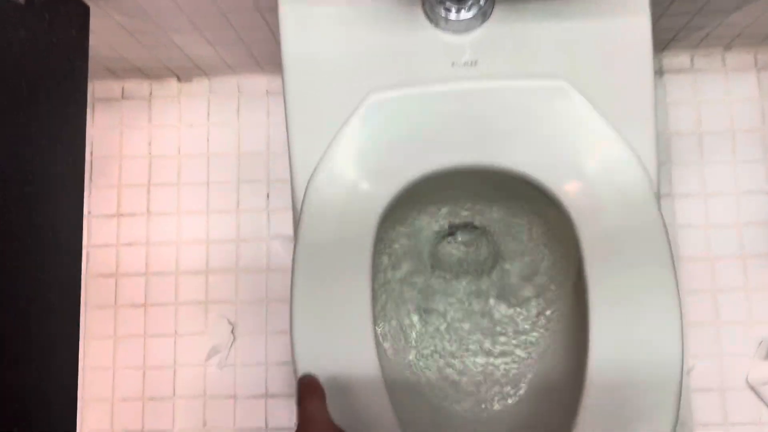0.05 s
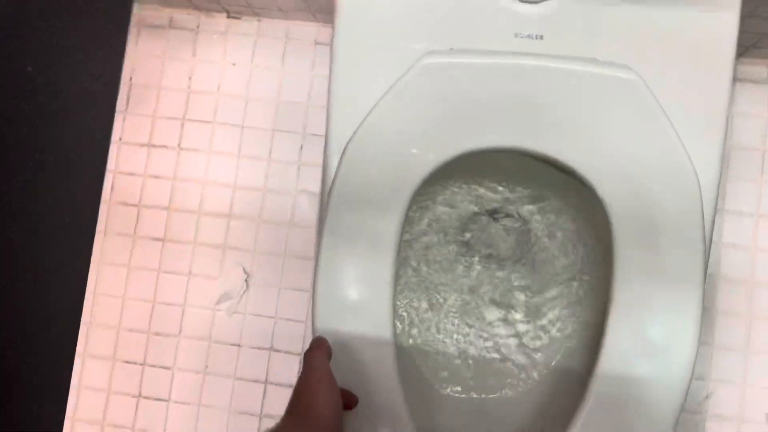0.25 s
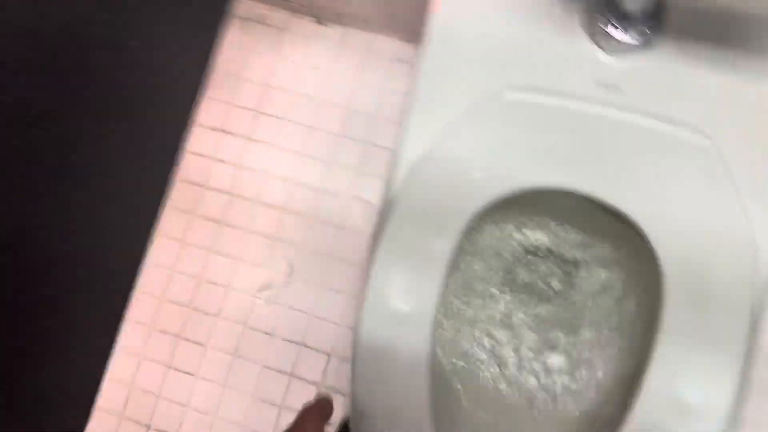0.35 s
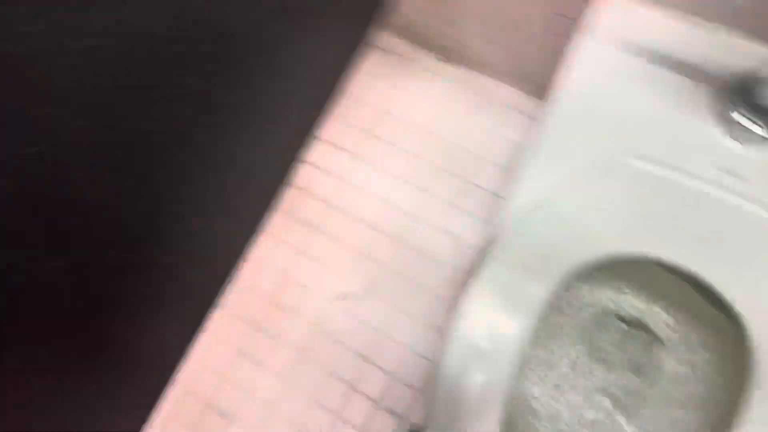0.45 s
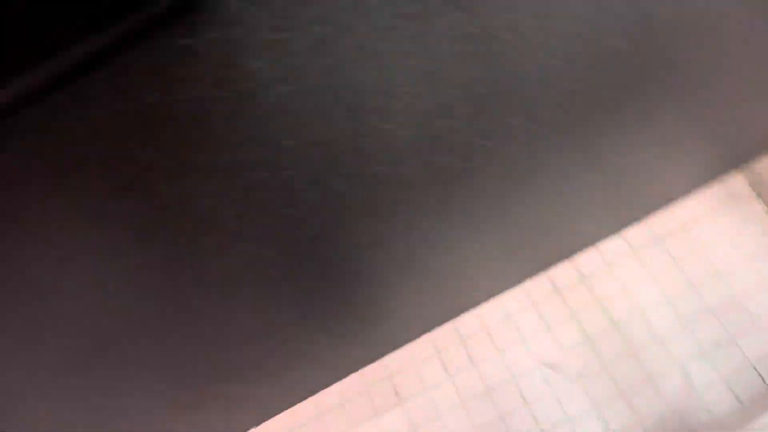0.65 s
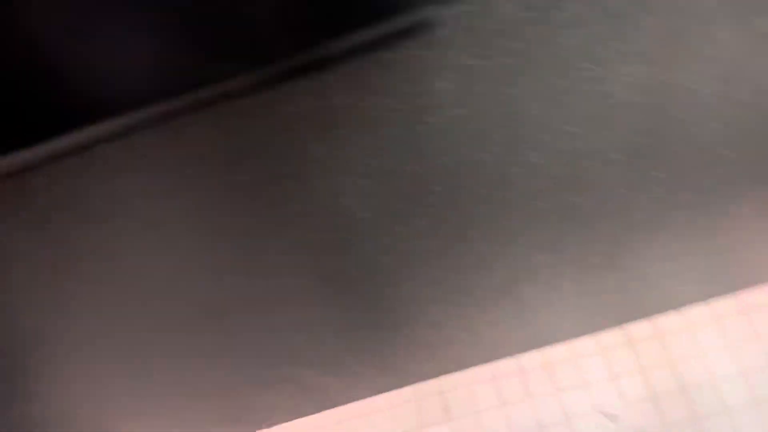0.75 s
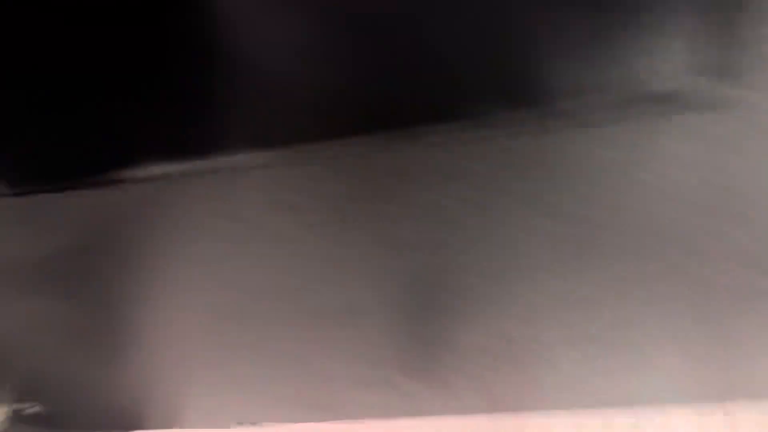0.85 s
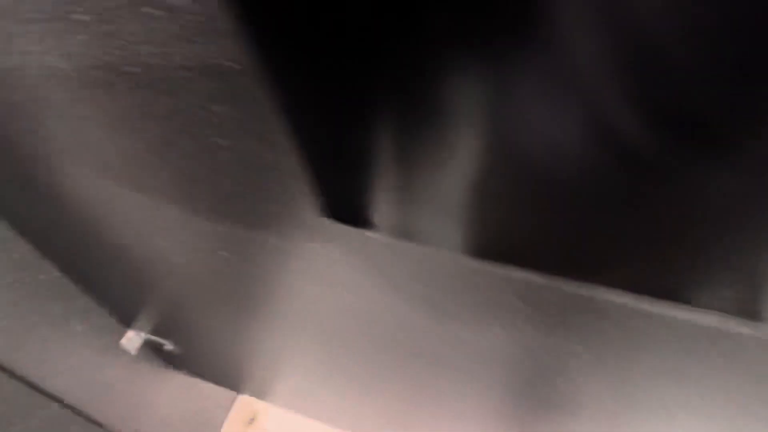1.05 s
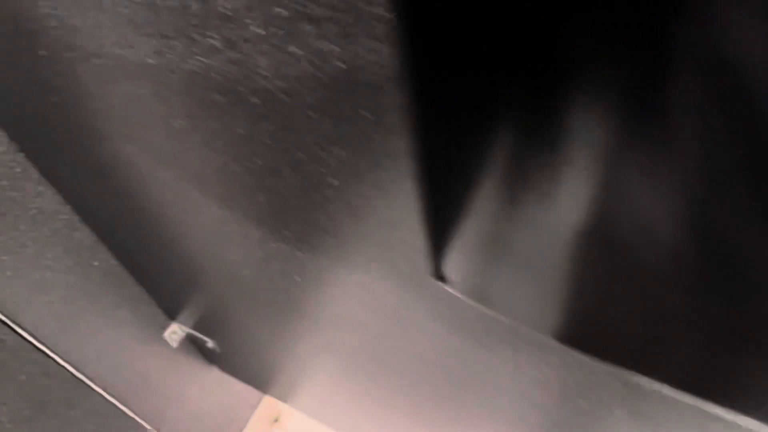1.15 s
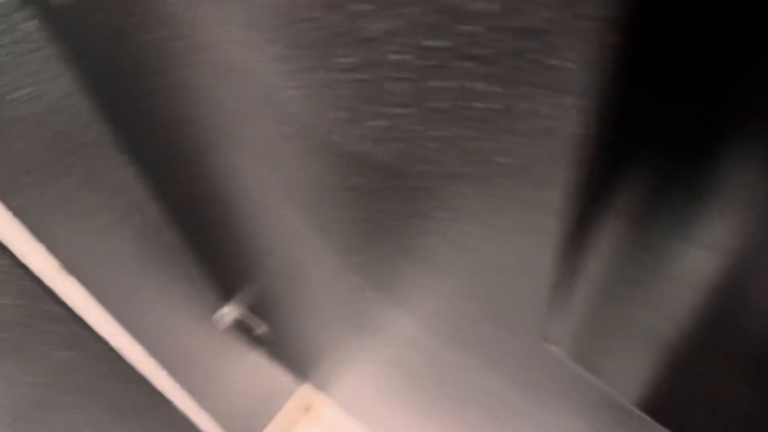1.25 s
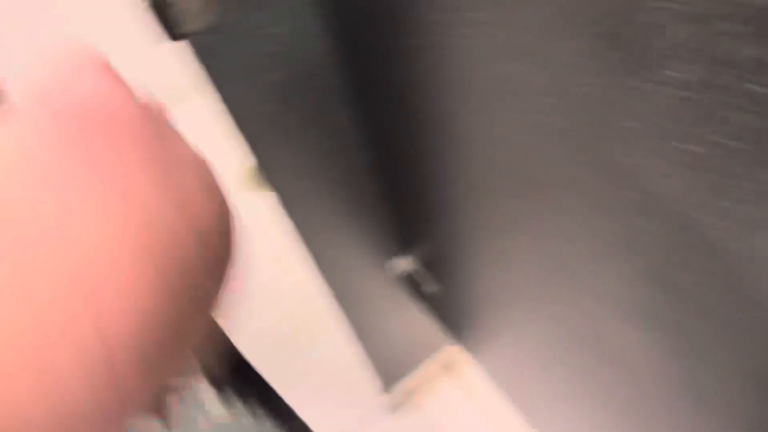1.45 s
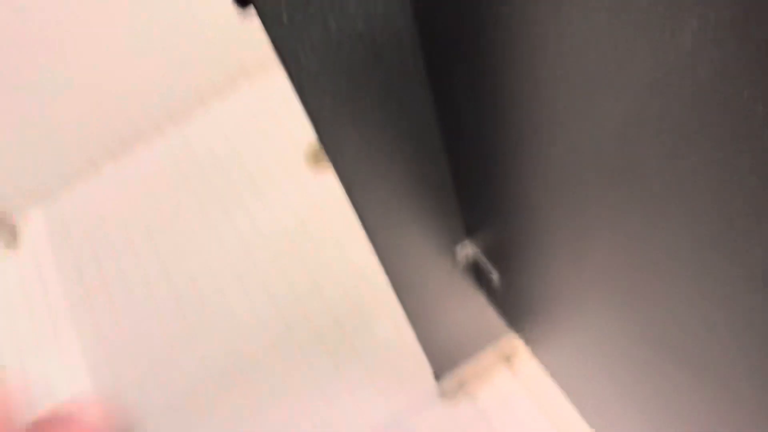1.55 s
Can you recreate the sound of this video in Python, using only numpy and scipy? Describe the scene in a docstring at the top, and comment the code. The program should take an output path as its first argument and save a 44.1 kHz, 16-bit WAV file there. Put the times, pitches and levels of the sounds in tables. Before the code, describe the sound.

A toilet seat drops onto the bowl with a sharp double clack in an echoing restroom.

```python
"""A toilet seat drops

A plastic seat falls on its porcelain bowl, chatters and bounces once; each hit cracks and rings.
The stall walls echo closely, and the tiled room rings on over humming, rumbling ventilation.
Then clothing rustles as someone turns round, with a few light knocks at the stall door."""
import sys
import numpy as np
from scipy import signal
from scipy.fft import rfft, irfft, next_fast_len
from scipy.io import wavfile
from scipy.ndimage import map_coordinates

SR = 44100
rng = np.random.default_rng(int(sys.argv[2]) if len(sys.argv) > 2 else 0)


def wav_record(signal):
    """Record a signal, one row per channel, as 16-bit PCM in the file named by sys.argv[1]."""
    frames = np.transpose(np.atleast_2d(signal))
    bounded = np.clip(frames, -1, 1)
    # unit amplitude maps onto the largest positive 16-bit level
    quanta = np.round(bounded * 32767).astype(np.int16)
    wavfile.write(sys.argv[1], SR, quanta)


N = 70560

# Levels are relative. A decay is the time to fade by 60 dB; a tilt above 0 adds treble.
# how alike left and right sound: f/Hz, likeness (1 = the same)
LIKENESS = [(60, 0.98), (350, 0.64), (520, 0.59), (900, 0.16), (2000, 0.1), (12000, 0.099)]
# duct rumble and fan tones: f/Hz, level/dB
DUCT_COLOUR = [(15, -19.5), (32, -24), (48, -1.5), (68, 2), (95, -7), (135, 1), (165, -14), (210, -12),
               (300, -19.5), (500, -25), (1000, -35), (2000, -41), (4000, -56), (8000, -63.5), (15000, -53)]
FAN_TONES = [(119.5, -37.5), (187, -47), (488, -56.5)]
# the seat hits the bowl: t/s, level/dB, crack and tick/dB, left over right/dB, tilt/(dB per octave)
SEAT_HITS = [(0.2001, -8.5, 0.5, 1, 0.77), (.2179, -15.5, 1, -1.5, 0.5), (0.2291, -17, 2.5, -1.5, -1),
             (0.2964, -11, -2, -0.5, -0.34), (0.3105, -19.5, 1.5, -1.5, -1.5)]
# ringing tones of seat and bowl: f/Hz, level/dB, decay/s, left over right/dB
SEAT_TONES = [(244.5, -10, 0.059, 2.5), (307.7, -10.5, 0.042, -14.5), (553.4, -14, 0.1, 3),
              (686, -7.5, 0.073, 8), (761, -5, 0.054, -2), (850, -12.5, 0.036, -18.5),
              (940, -24, 0.055, -5), (1170, -14.5, 0.086, 10), (1472, -19, 0.089, 3), (1787, -8, 0.073, -3),
              (2119, -8, 0.073, -9.5), (2065, 2.5, 0.017, -3), (2160, -28, 0.065, -13),
              (2630, -6, 0.019, 8.5), (3302, -18, 0.07, -13.5), (4860, -22, 0.028, 5)]
# the crack and the bright tick of a hit: f/Hz, level/dB
CRACK_COLOUR = [(60, -8), (260, -7.5), (390, -12), (560, -1), (720, 5), (1200, -5), (1550, -3.5),
                (1800, -3), (2120, 1.5), (2450, -4.5), (3200, -10), (3900, -19), (5000, -20.5), (7000, -33),
                (8500, -40.5), (15000, -49)]
TICK_COLOUR = [(2000, -12), (5000, 5), (8000, 14), (11500, -11), (14500, -2)]
# how long the stall and the room echo: f/Hz, decay/s
STALL_DECAY = [(200, 0.16), (2000, 0.078), (10000, 0.13)]
ROOM_DECAY = [(100, 3.3), (400, 1.55), (1000, 1.68), (2000, 1.37), (4000, 1.44), (10000, 2.1)]
# how strongly they echo: f/Hz, level/dB
STALL_COLOUR = [(200, -5), (400, -13.5), (700, 0.5), (1100, -1), (2000, 2.5), (3200, 1.5), (8000, 3.5)]
ROOM_COLOUR = [(80, 7.5), (250, -15.5), (410, 12.5), (540, -7), (680, -11), (950, 4), (1300, 1.5),
               (2100, -6.5), (2600, -5.5), (3200, -3), (8000, -12)]
# tones of the floor and of the room's standing waves: f/Hz, level/dB, decay/s
FLOOR_TONES = [(72.1, -14.5, 0.4), (132, -28, 0.6)]
ROOM_TONES = [(404.2, -33, 1.55), (489, -37.5, 1.52), (697.7, -32, 1.3), (740, -35, 0.67), (867, -37, 1.58)]
# how the cloth's hiss and low swish swell: t/s, level/dB
HISS_LEVELS = [(0, -60), (.45, -58.5), (.64, -55.5), (.8, -64), (1.0, -63.5), (1.07, -50.5), (1.13, -53),
               (1.2, -52.5), (1.3, -62.5), (1.42, -61.5), (1.6, -52.5)]
SWISH_LEVELS = [(0, -86), (.2, -39.5), (.9, -47), (1.08, -41.5), (1.23, -36.5), (1.35, -36.5), (1.5, -40),
                (1.6, -33)]
# their mix of bass and treble: f/Hz, level/dB
HISS_COLOUR = [(300, 3), (1000, 1.5), (2500, -5), (4200, -4.5), (6500, -6), (8500, -4), (11000, -17.5),
               (14500, -12)]
SWISH_COLOUR = [(20, -49), (60, -4), (130, 6), (210, 4), (330, -9), (600, -22), (1100, -22), (2500, -36),
                (8000, -52.5)]
# knocks at the door: t/s, level/dB, tilt/(dB per octave), bump/dB, panel ring/dB
DOOR_KNOCKS = [(0.915, -35.5, -6, -9, -5), (1.4795, -33, 0, -28, -1.5), (1.49, -36.5, -1.5, 1, -6),
               (1.563, -40, 6.5, -16, -19), (1.5672, -27.5, -4.5, 3.5, -10.5)]
# ringing tones of the door panel: f/Hz, level/dB, decay/s
DOOR_TONES = [(324.3, -3.5, 0.275), (716.3, -5, 0.27), (982, -4, 0.087), (1075, -12, 0.1), (1469, -4, 0.07),
              (1726, -11, 0.13), (2820, -17.5, 0.1), (3460, -5.5, 0.014)]
# the tap of a knock: f/Hz, level/dB
TAP_COLOUR = [(100, -30), (400, -12), (900, 7), (1300, 3.5), (2100, 0), (2700, -2), (3800, -1.5),
              (5500, -15.5), (8500, -15), (11000, -33), (15000, -34)]

ATTACK_S, ROOM_GAP_S, BACKGROUND_PAN_DB = 0.0007, 0.014, -2


def amp(db):
    """Turn decibels into a gain to multiply by."""
    return 10 ** (np.asarray(db) / 20)


def pan(db):
    """Left and right gains; above 0 the left is louder."""
    return amp(np.array([[db], [-db]]) / 2)


def along(points, hz):
    """Read between a table's rows on a pitch (log) scale."""
    freqs, values = np.transpose(points)
    return np.interp(np.log(hz + 1), np.log(freqs + 1), values)


def since(s):
    """Seconds since a moment, zero before it."""
    return np.maximum(np.arange(N) / SR - s, 0)


def fade(t, decay_s, rise_s=ATTACK_S):
    """Rise quickly, then die away."""
    return np.exp(-np.log(1000) * t / decay_s) * (1 - np.exp(-t / rise_s))


def wobble(rate):
    """A smooth curve through `rate` random points a second."""
    return map_coordinates(rng.standard_normal(N // 100), [since(0) * rate])


def noise(colour, tilt_db=0):
    """Shaped noise of strength (rms) 1; left and right are alike in the bass, unlike in the treble."""
    hz = np.fft.rfftfreq(N, 1 / SR)
    width = np.arccos(along(LIKENESS, hz)) / 2
    gain = amp(along(colour, hz) + tilt_db * np.log2(np.maximum(hz, 200)))
    white = rfft(rng.standard_normal((2, N)))
    mid, side = irfft(white * gain * [np.cos(width), np.sin(width)], N)
    stereo = np.array([mid + side, mid - side])
    return stereo / np.sqrt(np.mean(stereo ** 2) + 1e-20)


def ring(t, hz, db, decay_s, scatter_db=2.03):
    """One struck tone; the higher it is, the more left and right are out of step."""
    phase = np.arccos(along(LIKENESS, hz)) / 3 * np.array([[1], [-1]])
    gain = amp(db + scatter_db * rng.standard_normal())
    return gain * fade(t, decay_s) * np.sin(2 * np.pi * hz * t + phase)


def ventilation(rumble_db=-37, waver_db=1.5):
    """The duct rumbles and the fan hums with wavering tones."""
    hum = 0
    for hz, db in FAN_TONES:
        gain = amp(db + waver_db * wobble(8.05)) * np.sqrt(2)
        drift = 0.35 * wobble(6.82)
        hum += gain * np.sin(2 * np.pi * hz * since(0) + drift)
    return pan(BACKGROUND_PAN_DB) * (amp(rumble_db) * noise(DUCT_COLOUR) + hum)


def seat_hit(s, db, crack_db, pan_db, tilt_db):
    """Plastic hits porcelain: a tick, a crack and a short ring, and the restroom answers."""
    t = since(s)
    tones = sum(pan(side_db) * ring(t, hz, level + tilt_db * np.log2(hz / 1000), decay_s)
                for hz, level, decay_s, side_db in SEAT_TONES)
    floor_echo = amp(-7) * fade(since(s + 0.00645), decay_s=0.011)  # off the floor tiles
    burst = fade(t, decay_s=0.022) + floor_echo
    crack = amp(crack_db + 3.5) * burst * noise(CRACK_COLOUR, tilt_db)
    tick = amp(crack_db - 28.5) * fade(t, decay_s=0.027, rise_s=ATTACK_S / 2) * noise(TICK_COLOUR)
    echo = restroom(crack + amp(-12.5) * tones)  # the walls return less ring than crack
    return amp(db) * (pan(pan_db) * (tones + crack + tick) + echo)


def floor_thud():
    """Each hit of the seat thuds in the floor under the bowl."""
    return sum(amp(db + level) * fade(since(s), decay_s, rise_s=0.012) * np.sin(2 * np.pi * hz * since(s))
               for s, db, *_ in SEAT_HITS for hz, level, decay_s in FLOOR_TONES)


def wall_echo(decays, colour, gap_s, rise_s):
    """A wash of echoes in which each pitch dies at its own speed."""
    hz, t, bands = signal.stft(noise([(20, 0), (20000, 0)]), SR, nperseg=256)
    decay_s = along(decays, hz)[:, None]
    gain = amp(along(colour, hz))[:, None] * np.sqrt(2 * np.log(1000) / (decay_s * SR))
    fading = bands * gain * np.exp(-np.log(1000) * t / decay_s)
    tail = signal.istft(fading, SR, nperseg=256)[1][:, :N]
    return tail * (1 - np.exp(-since(gap_s) / rise_s))


def restroom(sound, echo_db=3):
    """The near stall walls send a sound back first, then the tiled room."""
    stall = wall_echo(STALL_DECAY, STALL_COLOUR, gap_s=0.0098, rise_s=0.0012)
    room = wall_echo(ROOM_DECAY, ROOM_COLOUR, ROOM_GAP_S, rise_s=0.0027)
    mono = sound.mean(axis=0, keepdims=True)
    return amp(echo_db) * signal.fftconvolve(mono, stall + room, axes=1)[:, :N]


def standing_waves(waver_db=4):
    """The first hit sets the room ringing; a random waver stands for close tones beating."""
    t = since(SEAT_HITS[0][0] + ROOM_GAP_S)
    return sum(amp(waver_db * wobble(21.8)) * ring(t, *tone) for tone in ROOM_TONES)


def clothing():
    """Cloth slides with a grainy hiss over a low swish."""
    hiss_db = np.interp(since(0), *np.transpose(HISS_LEVELS)) + 1.6 * wobble(83.85)
    hiss = amp(hiss_db) * noise(HISS_COLOUR)
    swish_db = np.interp(since(0), *np.transpose(SWISH_LEVELS)) + wobble(40.06)
    return hiss + pan(BACKGROUND_PAN_DB) * amp(swish_db) * noise(SWISH_COLOUR)


def door_knock(s, db, tilt_db, bump_db, ring_db):
    """A light tap with a dull bump rings the door panel."""
    t = since(s)
    tap = fade(t, decay_s=0.025) * noise(TAP_COLOUR, tilt_db)
    panel = amp(ring_db) * sum(ring(t, *tone) for tone in DOOR_TONES)
    bump = ring(t, hz=460, db=bump_db, decay_s=0.022)
    return amp(db) * (tap + bump + panel)


def scene():
    """Seat and door sound in the restroom, over the ventilation and clothing."""
    seat = sum(seat_hit(*hit) for hit in SEAT_HITS)
    door = sum(door_knock(*knock) for knock in DOOR_KNOCKS)
    boom = floor_thud() + standing_waves()
    return seat + boom + door + amp(-0.5) * restroom(door) + ventilation() + clothing()


def record(dry, ceiling=0.95, low_hz=17, top_hz=15600):
    """Round off the highest peaks, then drop the deepest bass and highest treble."""
    rounded = dry / (1 + np.abs(dry / ceiling) ** 8) ** (1 / 8)
    trimmed = signal.sosfilt(signal.butter(3, low_hz, "highpass", fs=SR, output="sos"), rounded)
    size = next_fast_len(N + SR // 2)
    below_top = np.fft.rfftfreq(size, 1 / SR) < top_hz
    return irfft(rfft(trimmed, size) * below_top, size)[:, :N]


dry = scene()
out = record(dry)
wav_record(out)
```